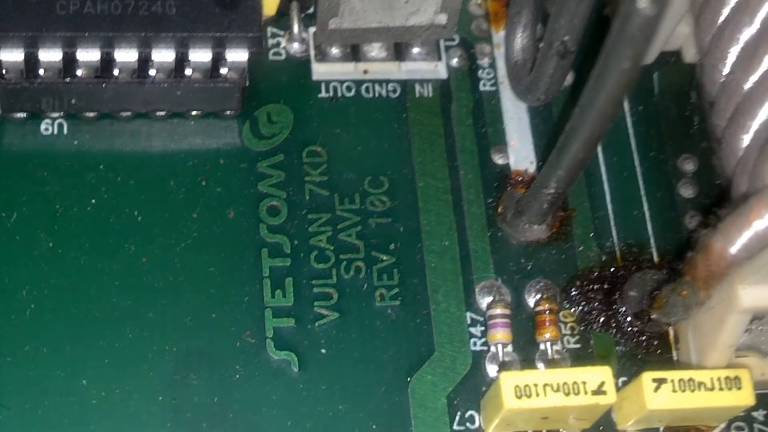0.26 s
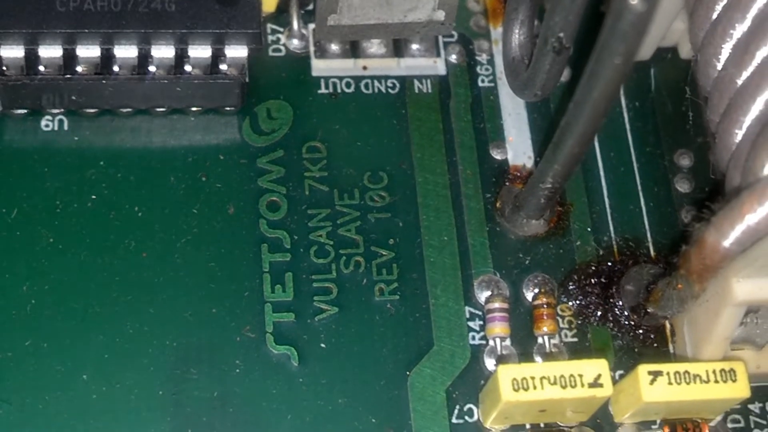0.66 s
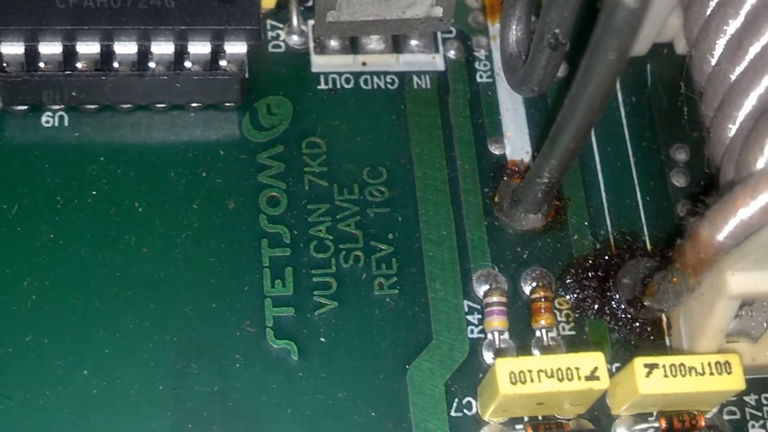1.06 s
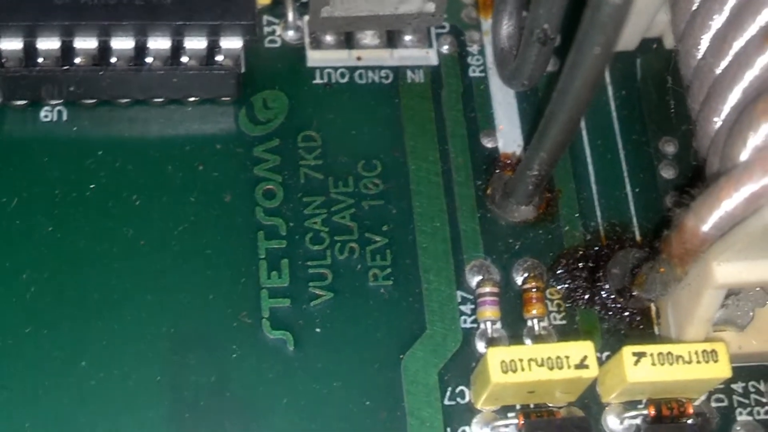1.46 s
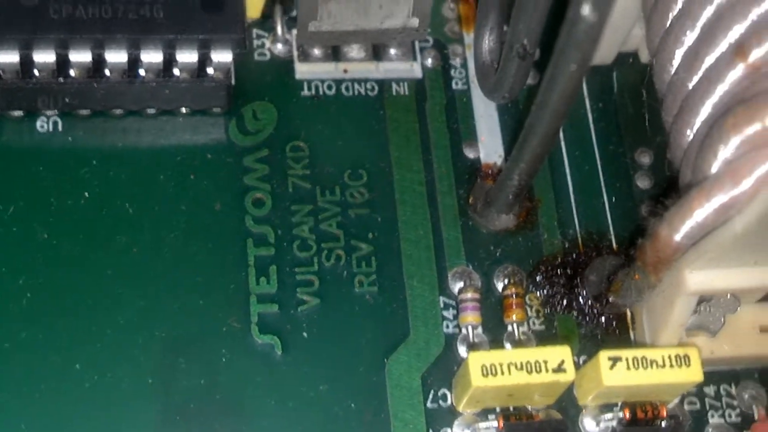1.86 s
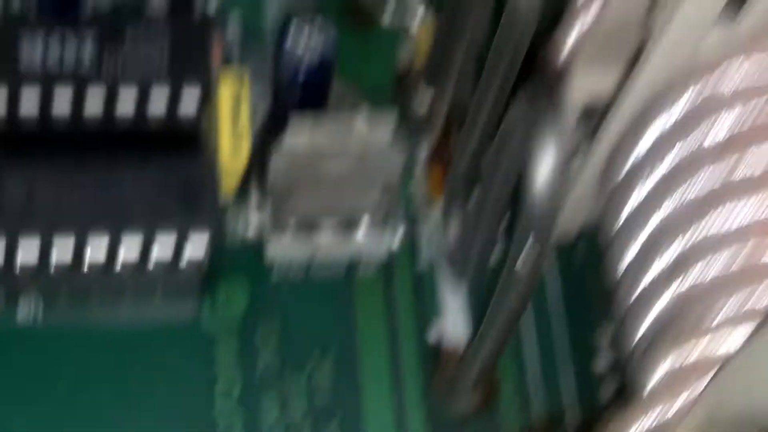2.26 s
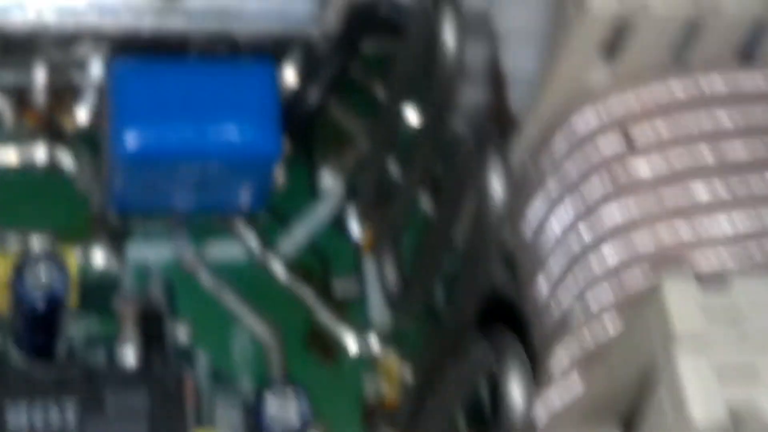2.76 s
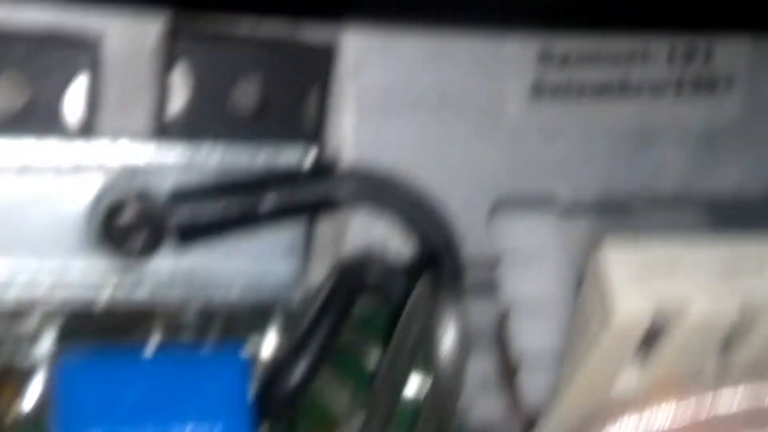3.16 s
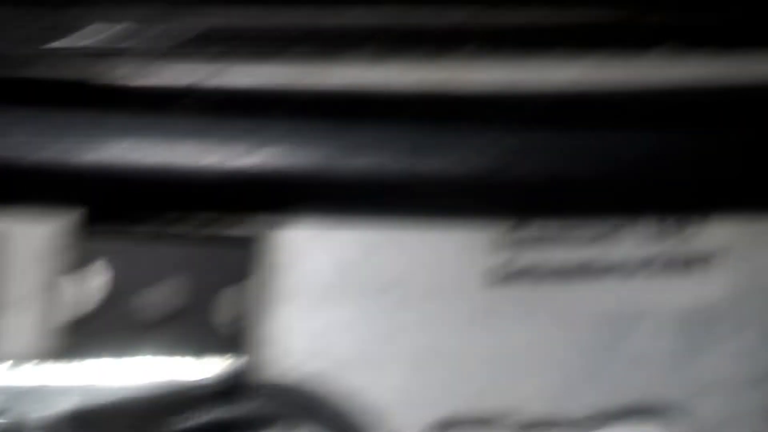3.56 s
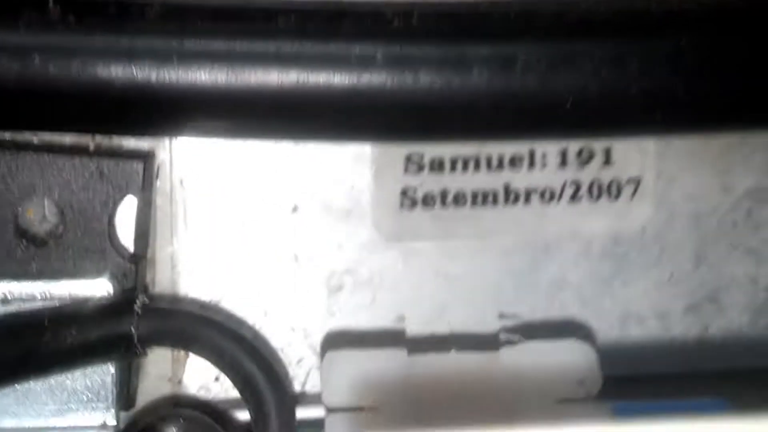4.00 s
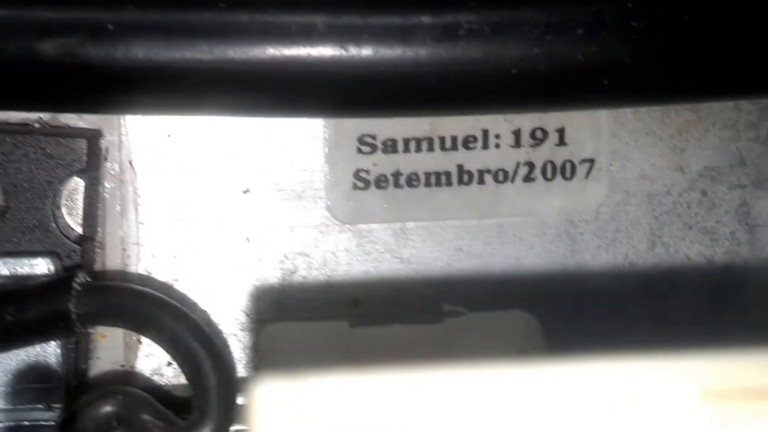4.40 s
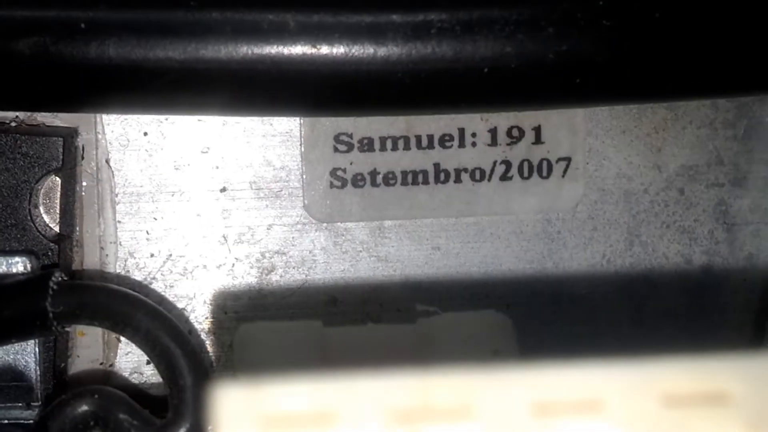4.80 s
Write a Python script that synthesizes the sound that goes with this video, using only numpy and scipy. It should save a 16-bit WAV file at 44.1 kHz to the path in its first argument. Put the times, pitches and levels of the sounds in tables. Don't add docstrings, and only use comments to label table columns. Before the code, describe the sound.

Close handling clicks, thuds and dry scuffs over a constant mains-like hum and a faint whine that rises and strengthens later.

```python
import sys
import numpy as np
from scipy import signal
from scipy.fft import rfft, irfft
from scipy.io import wavfile
from scipy.ndimage import uniform_filter1d

SR = 44100
rng = np.random.default_rng(int(sys.argv[2]) if len(sys.argv) > 2 else 0)


def how_loud(loudness_db):
    steps = np.asarray(loudness_db, float) / 20
    return 10 ** steps


def generate_wav(signal):
    frames = np.transpose(np.atleast_2d(signal))
    scaled = np.clip(frames, -1, 1) * 32767
    pcm = np.round(scaled).astype(np.int16)
    wavfile.write(sys.argv[1], SR, pcm)


N = 222345
TIME_S = np.arange(N) / SR
FREQ_HZ = np.fft.rfftfreq(N, 1 / SR)

# [f/Hz, density/dB per Hz, likeness of ports/0-1]
AIR = [(30, -62, .5), (52.7, -80.5, 0.8), (84, -80.5, 0.65), (130, -72.5, 0.83), (225, -73, 0.9),
       (344, -72.5, 0.89), (472, -82.5, 0.81), (758, -88.5, 0.42), (1000, -94.5, 0.13), (3790, -100, 0.12),
       (5800, -111, 1), (6880, -94.5, 0), (9000, -100, 0), (17000, -104, 0.3)]
# [multiple, level/dB, front minus rear/dB, front phase lead/rad]
MOTOR = [(3, -81, 7, -8), (6, -70.5, 18, 0.5), (8, -65.5, 6, 1.1), (9, -63.5, -1, 0.35),
         (10, -74.5, 16, 1.35), (11, -64, 1, -0.5), (12, -63.5, 3, 0.27), (13, -85, 17, 2.5),
         (14, -76.5, 7, 1.5), (27, -70.5, 4, 2.5), (58, -78, -16, -5.7), (59, -73, 15.5, 0.64),
         (66.4, -80.5, 0, 1), (63.45, -67, -5, 3.5), (71.3, -76, -6, 1.9), (134.7, -70.5, -5, -20),
         (255, -78, -9, 12.5)]
# [t/s, level/dB]
NEAR = [
    (0, -0.5),
    (2.2, 1),
    (2.6, -1),
    (3.5, -4.5),
    (4.3, -1),
    (5.04, -2),
]
# [multiple, level/dB, front minus rear/dB, front phase lead/rad]
FAN = [(2, -47, 1.5, 0.047), (3, -57, -4.5, 0.11)]
# [t/s, level/dB]
DRONE = [
    (0, -69),
    (2.0, -54),
    (3.3, -67),
    (3.6, -47.5),
    (4.4, -48),
    (4.7, -49.5),
    (5.04, -47.5),
]
# [t/s, f/Hz, level/dB]
WHINE = [(0, 6240, -63.5), (0.8, 6265, -63), (1.4, 6276, -63.5), (1.52, 6360, -61.5), (1.75, 6290, -63),
         (2.48, 6330, -62.5), (2.7, 6320, -63), (3.03, 6460, -59.5), (3.4, 6650, -57), (3.52, 6670, -60),
         (3.6, 6170, -75), (3.72, 6000, -66.5), (3.91, 6210, -61), (4.0, 6590, -56.5), (4.19, 6630, -56.5),
         (4.4, 6807, -55), (4.76, 6600, -57.5), (5.04, 6440, -59)]
# [t/s, f/Hz, peak level/dB, front minus rear/dB]
THUDS = [(0.343, 242, -37, 16), (.52, 199, -42, 10), (1.419, 300, -37.5, 14), (1.418, 111, -36, 16),
         (1.47, 172, -36, 15), (1.474, 105, -34, 17), (2.14, 150, -36, 15), (2.38, 140, -40, 16),
         (2.496, 130, -37.5, 15), (3.03, 120, -39, 13), (3.08, 110, -40.5, 15), (2.1377, 324, -28, 14.5),
         (2.205, 277, -35.5, 14), (3.162, 180, -49, 18), (3.262, 340, -24.5, 19), (3.264, 138, -31.5, 23),
         (3.5254, 425, -23.5, 13.5), (3.536, 484, -31, 9), (3.92, 110, -36, 16), (3.95, 105, -34, 14),
         (4.174, 176, -43, 19), (4.263, 314, -31.5, 8), (4.266, 130, -39, 16)]
# [f/Hz, level/dB, t60/ms, front minus rear/dB, front lag/ms]
LATCH = [(454, -11, 16, -2, 0.1), (1815, -11.5, 17, -16.5, -0.06), (1733, -30, 154, -8, .1),
         (4130, -1, 7.5, 1, 0.035), (3590, -14, 10.6, -2, .0086)]
SHELL = [(516, 3, 10.4, 6.5, 0.024), (1000, -7.5, 9.8, -3, 0.24), (2860, -10, 5.4, -7, 0.041)]
CLASP = [(7300, -2, 0.62, -11.5, .23), (3880, -29, 3, -19, 0.41), (1000, -20, 13.6, -15, 0.69),
         (466, -20.5, 14.7, 17.5, 0.0038), (1260, -18.5, 11.3, -9, 0.22)]
CORNER = [(286, -15.5, 8.8, 6, 0.59), (580, 0.5, 2.2, -7.5, 0.49), (1534, -8, 2.1, -9, 0.39),
          (130, -31, 23, -17, 0.57), (4160, -19.5, 1.33, -10.5, 0.387)]
# [part, rise/per cycle, taps [t/s, peak level/dB, sharpness/dB per octave, pitch factor]]
TAPS = [
    (LATCH, 1.64, [(.6733, -40, -3, 0.95), (.6785, -18.5, -0.5, 0.99), (.958, -42, 4, .93), (.966, -42, 5, .96)]),
    (SHELL, 1.6, [(.171, -39.5, 2, 1), (2.3795, -28.5, -1, 0.97), (2.700, -49, 0, 0.89), (3.985, -35, -1.5, 1.25)]),
    (CLASP, 3.7, [(2.4947, -7.5, 1, 0.98)]),
    (CORNER, 4.4, [(4.5944, -8, 0.5, 0.92)]),
]
# [t/s, centre f/Hz, level/dB, length/ms, front minus rear/dB]
SCUFFS = [(.392, 10000, -44.5, 1.7, -1), (.679, 9000, -43, 2.2, -9), (2.499, 7000, -37, 3.5, -10),
          (2.523, 1300, -48, 4.3, -5), (2.701, 1300, -47.5, 3.1, 2), (3.527, 7000, -42, 5.7, -5),
          (4.1702, 5100, -31, 2.4, -5), (4.169, 1000, -43.5, 3.6, -3), (4.2644, 4700, -33, 3.1, 2),
          (4.264, 1183, -43, 2.2, 5), (4.28, 7100, -52, 7.6, -6), (4.258, 5040, -55, 11, -10),
          (2.38, 2950, -47, 4, -11), (3.265, 1900, -51.5, 5.6, 21), (4.597, 7000, -56, 1.1, -5)]
# [start t/s, length/s, pressure level/dB, hiss over it/dB, grind over it/dB]
STROKES = [(2.515, 0.031, -55, -4, 0), (2.525, 0.15, -56.5, -4.5, 3), (2.689, 0.19, -54.5, -6, 2),
           (2.717, 0.098, -52.5, -2, -8), (2.906, 0.072, -54, -7.5, -2), (2.987, 0.076, -48.5, -3, -12),
           (3.393, 0.18, -49.5, 0, -3), (3.528, 0.12, -47.5, 3.5, 0.5), (3.597, 0.1, -48, 1.5, -0.5),
           (3.724, 0.1, -56.5, 3, 3), (3.85, 0.2, -64, -5, -8), (3.995, 0.03, -47, -4.5, 10.5),
           (4.03, 0.036, -42.5, -10, 8), (4.061, 0.016, -64, 0, -6), (4.133, .02, -58.5, 6, 2),
           (4.25, .015, -69, -1, 7)]
# [start t/s, length/s, pressure level/dB]
GRIPS = [(2.5, 0.016, -48), (2.699, 0.26, -60), (2.982, 0.078, -47.5), (3.387, 0.17, -50),
         (3.529, 0.092, -47.5), (3.596, .1, -42.5), (3.742, 0.099, -51), (3.851, 0.15, -55),
         (3.991, .11, -47), (4.108, 0.084, -55), (4.255, 0.021, -47.5)]
# [f/Hz, width/Hz, level/dB]
SCRAPE_MODES = [(1230, 380, 9), (1910, 380, -6), (2570, 1100, -4)]
GRIND_MODES = [(560, 170, -.5), (786, 460, -1.2), (970, 360, -.5)]
HISS_MODES = [(3560, 4800, 20), (6000, 4800, 46), (9500, 5000, -40), (13500, 4000, -9)]
RUMBLE_MODES = [(380, 144, 2), (150, 150, -1.5), (560, 150, -8.5)]
# [t/s, depth level/dB]
DUCKS = [
    (2.498, -12),
    (4.597, -4.5),
]

MOTOR_HZ, MAINS_HZ, FAN_HZ, DRONE_HZ = 58.76, 120, 132.7, 124.5
AIR_FRONT_DB = -3
RECOVERY_DB_PER_S = 9
THUD_T60_MS, THUD_T60_SLOPE, THUD_LAG_MS = 11.5, -0.16, 0.058
SOFT_RISE_PER_CYCLE = 1.64
SCUFF_WIDTH = 0.8
STROKE_ATTACK_S, STROKE_RELEASE_S = 0.007, 0.005
STROKE_ARCH_DB = 3.5
PORT_LAG_SAMPLES, PORT_CROSS_GAIN = 17, 0.68
BASS_HZ, TOP_HZ = 83, 15650


def curve(table):
    t_s, *columns = np.transpose(table)
    return [np.interp(TIME_S, t_s, column) for column in columns]


def unit(x):
    return x / np.sqrt(np.mean(x ** 2))


def walk(rate_hz):
    hold = int(SR / rate_hz)
    steps = np.repeat(rng.standard_normal(N // hold + 1), hold)
    slewed = uniform_filter1d(uniform_filter1d(steps, hold), hold)
    return unit(slewed[:N])


def resonate(x, modes):
    response = 0
    for hz, width_hz, db in modes:
        detuning = (FREQ_HZ ** 2 - hz ** 2) / (np.maximum(FREQ_HZ, 1) * width_hz)
        response = response + how_loud(db) / (1 + 1j * detuning)
    return irfft(rfft(x) * response, N)


def ports(front_db):
    return how_loud(np.array([[front_db], [-front_db]]) / 2)


def gain_db():
    total_db = 0
    for t_s, depth_db in DUCKS:
        age_s = TIME_S - t_s
        onset = np.clip(age_s / 0.0057 + 1, 0, 1)
        total_db = total_db + np.minimum(depth_db + RECOVERY_DB_PER_S * age_s, 0) * onset
    return total_db


def air():
    hz, db, like = np.transpose(AIR)
    log_hz = np.log(np.maximum(FREQ_HZ, 10))
    gain = how_loud(np.interp(log_hz, np.log(hz), db)) * np.sqrt(SR / 2)
    like = np.clip(np.interp(log_hz, np.log(hz), like), 0, 1)
    throb = how_loud(0.13 * np.array([walk(24.75) for _ in range(3)]))
    shared, front, rear = rfft(rng.standard_normal((3, N)) * throb)
    common = np.sqrt(like) * shared * ports(AIR_FRONT_DB)
    private = np.sqrt(1 - like) * np.array([front, rear])
    return irfft(gain * (common + private), N)


def partials(hz, table, wander_hz, flutter_db):
    turn_rad = 2 * np.pi * np.cumsum(hz + wander_hz * walk(3)) / SR
    out = 0
    for multiple, db, front_db, lead_rad in table:
        phase = round(multiple) * turn_rad + rng.uniform(0, 2 * np.pi) + np.array([[lead_rad], [0]])
        level = how_loud(db + 1 + flutter_db * walk(14))
        out = out + level * ports(front_db) * np.sin(phase)
    return out


def motor():
    return how_loud(curve(NEAR)[0]) * partials(MOTOR_HZ, MOTOR, wander_hz=0.0408, flutter_db=2.0)


def mains():
    return partials(MAINS_HZ, [(2, -52.5, 0.011, 0.014)], wander_hz=0.822, flutter_db=4.5)


def fan():
    return partials(FAN_HZ, FAN, wander_hz=0.759, flutter_db=2.5)


def drone():
    line = partials(DRONE_HZ, [(1, 0.0071, 0, 0)], wander_hz=1.64, flutter_db=-1.5)
    return how_loud(curve(DRONE)[0]) * line


def whine():
    hz, db = curve(WHINE)
    shiver_hz = 55 * walk(250) + 20 * walk(30) + 35 * np.abs(walk(700)) - 8
    phase = 2 * np.pi * np.cumsum(hz + shiver_hz) / SR
    rough = 1 + 0.025 * walk(1100) + 0.026 * walk(60)
    tone = ports(-16.5) * rough * np.sin(phase + np.array([[0.3], [0]]))
    lowpass = signal.butter(1, 350, fs=SR, output="sos")
    jitter = unit(signal.sosfilt(lowpass, rng.standard_normal((2, N))))
    skirt = how_loud(-4.5) * jitter * np.sin(phase + 2 * np.pi * 150 * TIME_S)
    level = how_loud(db + gain_db() + 0.6 * walk(12) + 1.0 * walk(90) + 3.5)
    return level * (tone + ports(0.5) * skirt)


def add_ring(out, t_s, hz, db, t60_ms, front_db, lag_ms, rise_per_cycle):
    age_s = np.arange(SR // 8) / SR
    lag_s = np.array([[max(lag_ms, 0)], [max(-lag_ms, 0)]]) / 1000
    t = np.maximum(age_s - lag_s, 0)
    attack = (1 - np.exp(-rise_per_cycle * hz * t)) ** 2
    decay = np.exp(-np.log(1000) * t / (t60_ms / 1000))
    wave = attack * decay * np.sin(2 * np.pi * hz * t)
    i = int(t_s * SR)
    out[:, i:i + len(age_s)] += how_loud(db) * ports(front_db) * wave / np.abs(wave).max()


def thuds():
    out = np.zeros((2, N))
    for t_s, hz, db, front_db in THUDS:
        t60_ms = THUD_T60_MS * (hz / 300) ** THUD_T60_SLOPE
        add_ring(out, t_s, hz, db, t60_ms, front_db, THUD_LAG_MS, SOFT_RISE_PER_CYCLE)
    return out


def taps():
    out = np.zeros((2, N))
    for part, part_rise, hits in TAPS:
        for t_s, db, sharp_db, pitch in hits:
            for hz, mode_db, t60_ms, front_db, lag_ms in part:
                if part == LATCH:
                    tilt_db = -sharp_db * abs(np.log2(hz / 1700))
                else:
                    tilt_db = sharp_db * np.log2(hz / 500)
                rise = SOFT_RISE_PER_CYCLE if front_db > 8 else part_rise
                add_ring(out, t_s, hz * pitch, db + mode_db + tilt_db, t60_ms, front_db, lag_ms, rise)
    return out


def scuffs():
    out = np.zeros((2, N))
    for t_s, hz, db, length_ms, front_db in SCUFFS:
        age = (TIME_S - t_s) / (length_ms / 1000)
        puff = np.exp(np.where(age < 0, 4 * age, -age))
        noise = unit(resonate(rng.standard_normal((2, N)), [(hz, SCUFF_WIDTH * hz, 0)]))
        out += how_loud(db) * ports(front_db) * puff * noise
    return out


def stroke_power(start_s, length_s):
    start_s, length_s = start_s[:, None], length_s[:, None]
    touch = (TIME_S - start_s) / STROKE_ATTACK_S
    lift = (start_s + length_s - TIME_S) / STROKE_RELEASE_S
    edge = np.minimum(0, np.minimum(touch, lift))
    off_middle = np.minimum(np.abs(2 * (TIME_S - start_s) / length_s - 1), 1)
    return (np.exp(edge) * how_loud(-STROKE_ARCH_DB * off_middle ** 2)) ** 2


def rub():
    start_s, length_s, db, hiss_db, grind_db = np.transpose(STROKES)
    power = stroke_power(start_s, length_s)
    unsteady = how_loud(0.74 * walk(25.24) + 1.02 * walk(90))
    scrape_level = unsteady * np.sqrt(how_loud(db) ** 2 @ power)
    hiss_level = unsteady * np.sqrt(how_loud(db + hiss_db) ** 2 @ power)
    grind_level = unsteady * np.sqrt(how_loud(db + grind_db) ** 2 @ power)
    start_s, length_s, db = np.transpose(GRIPS)
    rumble_level = np.sqrt(how_loud(db) ** 2 @ stroke_power(start_s, length_s))
    out = []
    for side in (1, -1):
        sparse = rng.random((2, N)) < 0.1
        slips = rng.standard_normal((2, N)) * sparse * how_loud(2.0 * rng.exponential(size=(2, N)))
        skin = rng.standard_normal(N) * how_loud(1.0 * walk(120))
        scrape = how_loud(-1.0 + side * 0.22) * unit(resonate(slips[0], SCRAPE_MODES))
        ground = resonate(resonate(slips[0], GRIND_MODES), GRIND_MODES)
        grind = how_loud(-2.5 + side * 3.7) * unit(ground)
        hiss = how_loud(2 - side * 3.2) * unit(resonate(skin, HISS_MODES))
        rumble = how_loud(side * 2.5 + 3.56 * walk(60)) * unit(resonate(slips[1], RUMBLE_MODES))
        rubbed = scrape_level * scrape + grind_level * grind + hiss_level * hiss
        out.append(rubbed + rumble_level * rumble)
    return np.array(out)


def scene():
    room = how_loud(gain_db()) * (air() + motor() + mains() + fan())
    handling = thuds() + taps() + scuffs() + rub()
    return room + drone() + whine() + handling


def band_limit(x):
    return signal.sosfilt(signal.butter(12, 16460, fs=SR, output="sos"), x)


def record(dry):
    dry = signal.sosfilt(signal.butter(3, BASS_HZ, "high", fs=SR, output="sos"), dry)
    late = np.pad(dry[::-1], ((0, 0), (PORT_LAG_SAMPLES, 0)))[:, :N]
    crossed = dry - PORT_CROSS_GAIN * late
    treble = np.sqrt(uniform_filter1d(np.diff(crossed, prepend=0) ** 2, size=1024) + 1e-18)
    grit = resonate(rng.standard_normal((2, N)), [(7000, 16000, 0)]) * how_loud(-23 + 1.5 * walk(40))
    lowpass = signal.ellip(8, 0.2, 50, TOP_HZ, fs=SR, output="sos")
    mix = signal.sosfiltfilt(lowpass, crossed + treble * grit)
    return band_limit(mix)


dry = scene()
out = record(dry)
generate_wav(out)
```